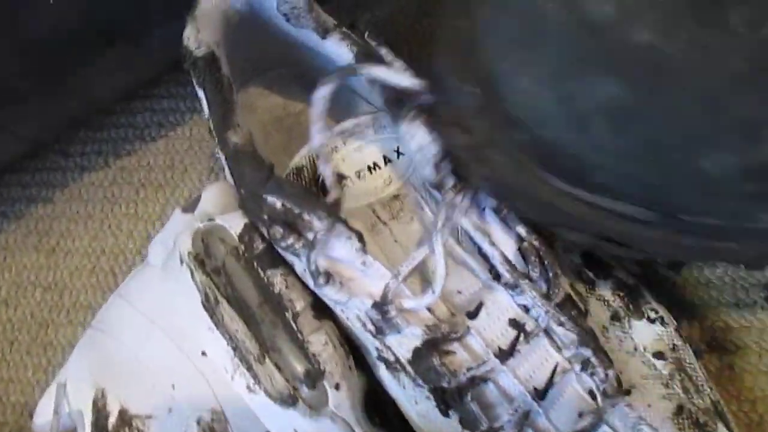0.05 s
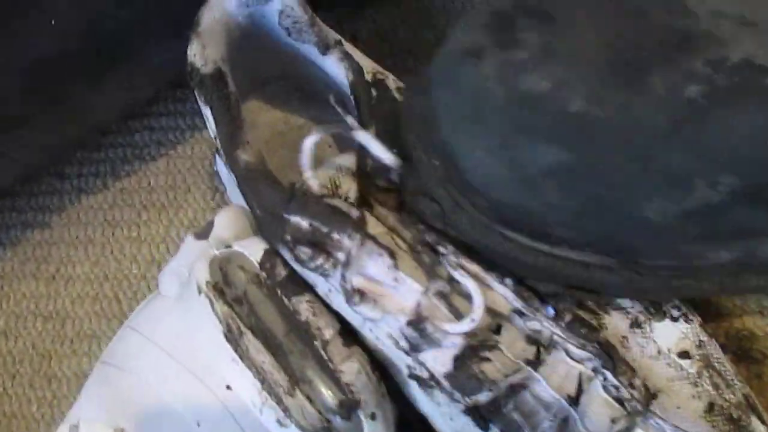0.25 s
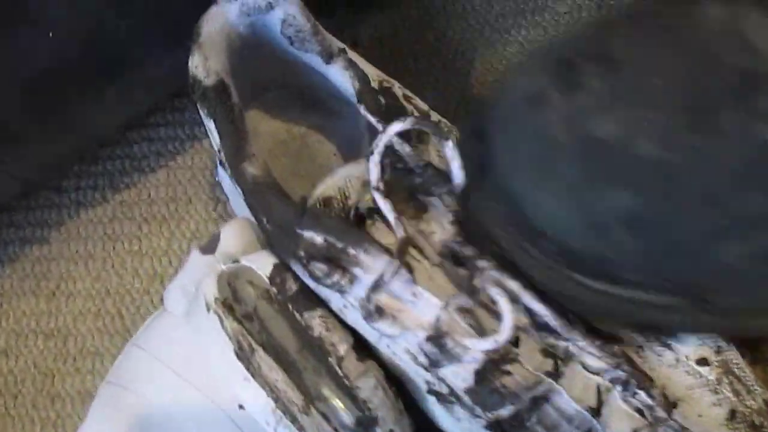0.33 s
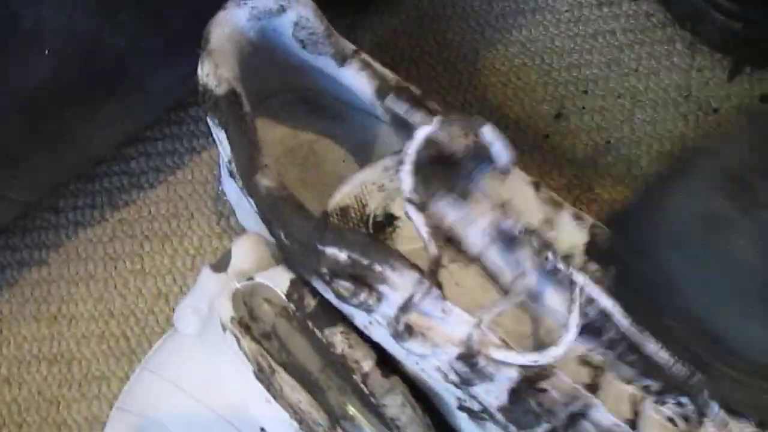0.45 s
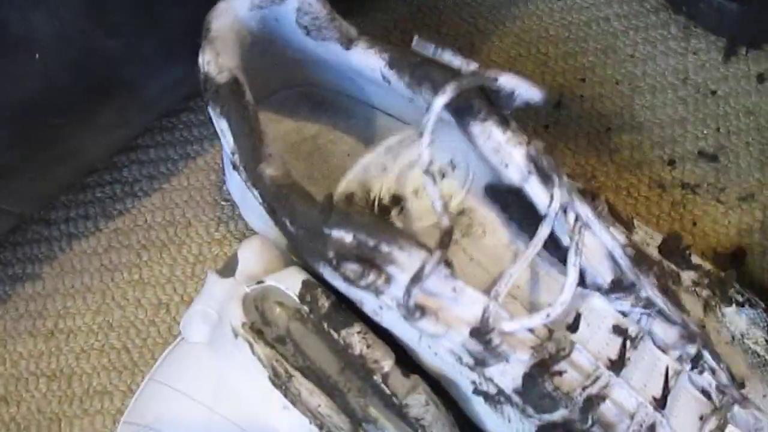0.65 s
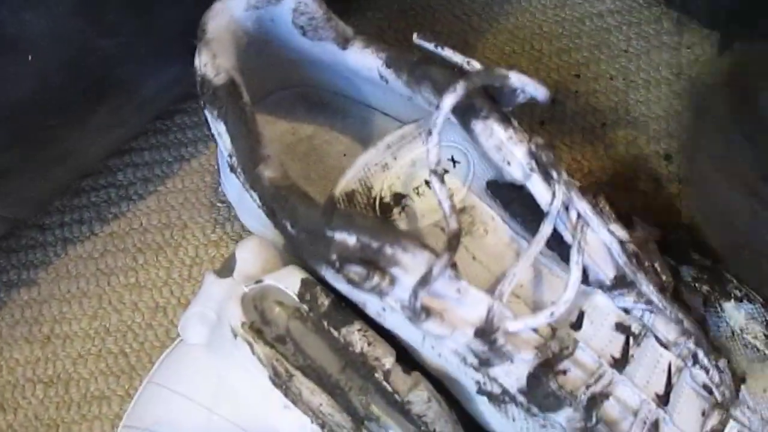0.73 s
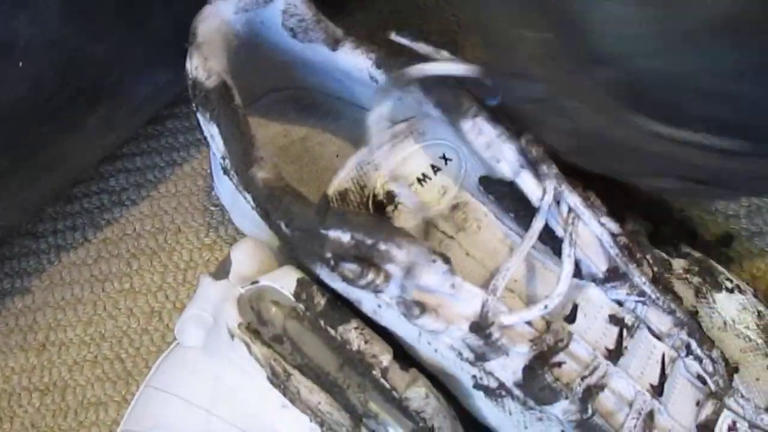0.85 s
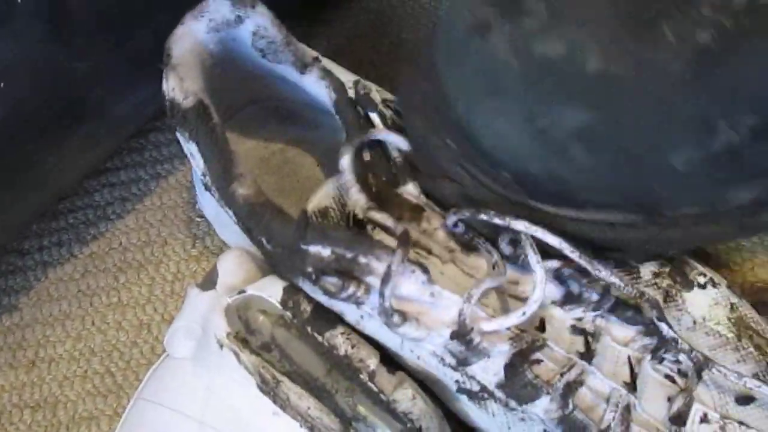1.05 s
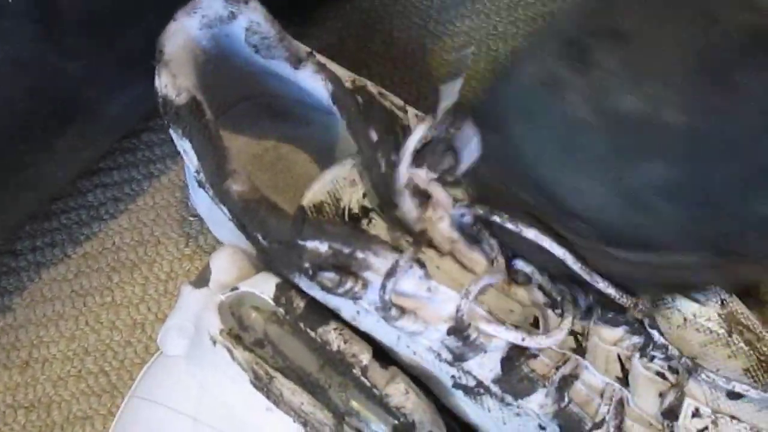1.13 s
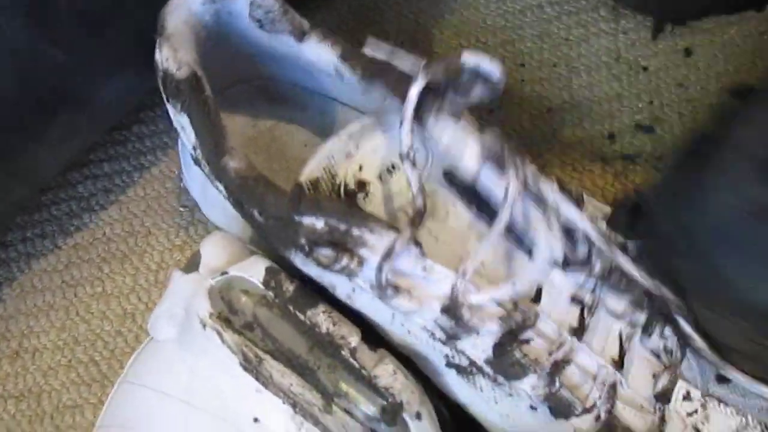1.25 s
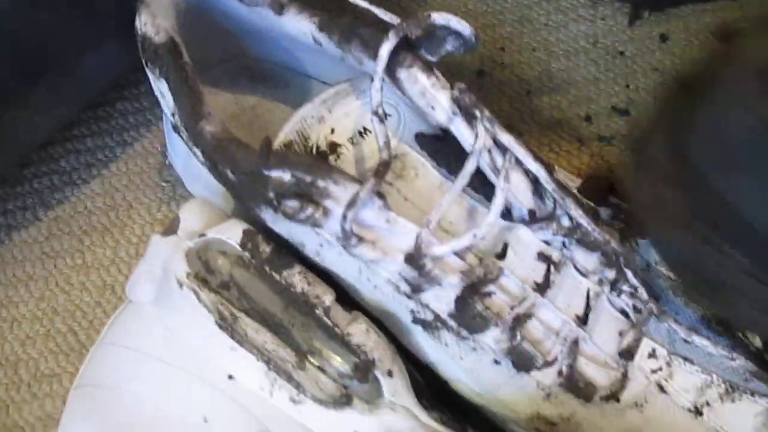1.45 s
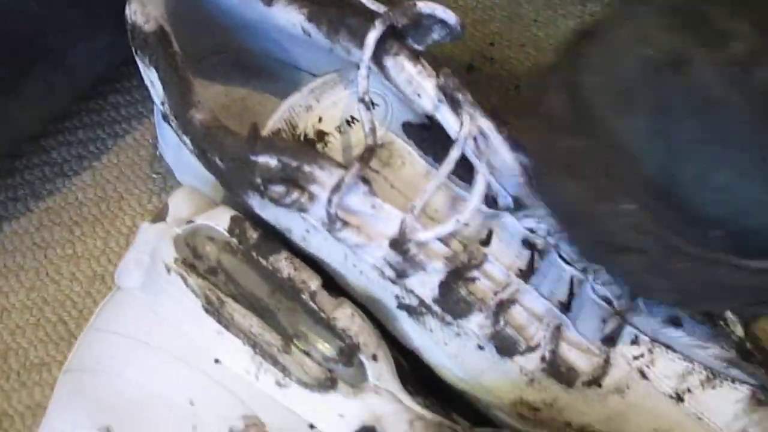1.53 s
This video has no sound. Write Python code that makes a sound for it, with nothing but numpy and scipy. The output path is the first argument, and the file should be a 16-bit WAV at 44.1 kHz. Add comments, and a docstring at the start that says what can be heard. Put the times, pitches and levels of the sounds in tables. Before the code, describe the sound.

A rubber boot scrapes over a muddy shoe, close by in a quiet room. The first gritty rub grows from about 0.2 seconds, with crumbs crunching, then judders into hollow, rubbery knocks until 0.6. A soft floor thud follows near 0.7. The second rub starts around 0.9 seconds, sticks and slips with knocks and a rough groan from 1.1 to 1.35, then fades into faint rubber flexing.

```python
"""Wiping a boot on a muddy shoe

A rubber boot is wiped twice down a muddy shoe that lies on a woven mat, close by in a quiet room.
Each stroke starts as a gritty rub; as the boot bears down it sticks and slips, and the hollow shoe knocks.
The boot's shaft flexes now and then. Between strokes it brushes back lightly and the floor thuds softly."""
import sys
import numpy as np
from scipy import signal
from scipy.fft import rfft, irfft
from scipy.io import wavfile
from scipy.ndimage import uniform_filter1d

SR = 44100
rng = np.random.default_rng(int(sys.argv[2]) if len(sys.argv) > 2 else 0)


def file_out(sig):
    """Save sig as 16-bit WAV at sys.argv[1]."""
    # one column per channel
    cols = np.atleast_2d(sig).T
    # limit, then scale
    lim = np.clip(cols, -1, 1)
    pcm = np.round(lim * 32767).astype(np.int16)
    wavfile.write(sys.argv[1], SR, pcm)


N = 70560

# the sole rubs over dried mud: stroke, light brush back, stroke (t/s, level/dB, share of fine grit/dB)
FIRST_RUB = [(0, -46, -9), (.03, -49, -22), (.084, -44.5, -10), (.105, -51, -7), (.138, -43.5, -28),
             (.18, -45.5, -23), (.21, -34, -10), (.228, -36.5, -1), (.238, -39.5, -19), (.268, -46.5, -16),
             (.304, -37.5, -6), (.375, -31.5, -14), (.398, -30.5, -10), (.408, -31.5, -9),
             (.423, -31.5, -14), (.433, -37.5, -9), (.468, -28, -17.5), (.495, -32, -10), (.52, -34.5, -4),
             (.53, -32, -1.5), (.555, -35.5, -1.5), (.585, -38, -5), (.607, -41, -12), (.616, -56.5, -20)]
BRUSH_BACK = [(.65, -66, -5), (.82, -59.5, -7)]
SECOND_RUB = [(.86, -59, -12), (.91, -49.5, -12), (.922, -41.5, -10), (.942, -42, -5), (.955, -47.5, -7),
              (0.999, -41, -7.5), (1.03, -52.5, -17), (1.082, -33.5, -1), (1.103, -27, -9),
              (1.117, -28.5, -3), (1.14, -24.5, -17), (1.155, -30.5, -13.5), (1.18, -35.5, -9.5),
              (1.227, -32.5, -21), (1.234, -24.5, -36), (1.244, -30.5, -14), (1.28, -37, -3.5),
              (1.293, -39.5, 2), (1.306, -35, -2), (1.312, -46, -16), (1.346, -48.5, -0.5),
              (1.353, -49.5, 4), (1.363, -55, -18), (1.42, -62, -6), (1.555, -52, -11), (1.585, -45.5, -35)]
# tone of coarse mud and of fine grit (f/Hz, level/dB)
MUD_TONE = [(50, -25), (150, -14), (400, 1), (800, 0.5), (1300, 0.5), (2100, 2), (3600, -1), (5400, -4),
            (7000, -18), (10000, -25), (15500, -40)]
GRIT_TONE = [(1000, -23), (3500, -3), (5800, 3.5), (8000, -5), (10000, -13), (12500, -21.5), (15500, -33)]
# pitches at which the shoe's stiff upper rings (f/Hz, width/Hz, level/dB)
UPPER_RINGS = [(847, 18, -2), (1008, 125, 0.5), (1703, 34, -2), (2183, 240, -9.5), (2740, 23, -18.5),
               (3237, 53, -7), (3600, 48, -6), (3840, 51, -11.5), (4980, 27, -14.5), (5190, 53, -10),
               (7180, 160, -7), (9150, 66, -8)]
# how hard the boot presses in each stroke, as the strength of its judder (t/s, level/dB)
FIRST_PRESS = [(0, -65), (.055, -40.5), (.11, -50), (.18, -46.5), (.222, -38.5), (.27, -50), (.31, -38),
               (.37, -37.5), (.405, -27.5), (.43, -30), (.465, -27.5), (.5, -33), (.55, -25), (.572, -33.5),
               (.605, -29.5), (.62, -52), (.66, -61)]
SECOND_PRESS = [(.84, -55), (.94, -48), (1.0, -44.5), (1.04, -47), (1.1, -27.5), (1.145, -36),
                (1.18, -30.5), (1.23, -24.5), (1.275, -27), (1.305, -26.5), (1.322, -34), (1.353, -40),
                (1.37, -52.5), (1.46, -60), (1.55, -58), (1.585, -51), (1.6, -39.5)]
# pitches at which the hollow shoe rings (f/Hz, time to fade by 60 dB/s, level/dB)
SHOE_RINGS = [(321.2, 0.081, -7), (434, 0.062, -3.5), (477.6, 0.054, 2), (531, 0.026, 1), (652, 0.043, -3),
              (764, 0.026, -2.5), (852, 0.068, -7), (978, 0.018, -6)]
# the hollow of the shoe favours middle pitches (f/Hz, level/dB)
HOLLOW_TONE = [(60, -32.5), (200, -8), (255, -9.5), (300, 0.5), (380, 0), (850, 2), (1150, -0.5),
               (3000, -11)]
# the rubber groans higher as the sole tightens (t/s, f/Hz)
GROAN_PITCH = [(.3, 448.3), (.405, 469.3), (.455, 391.6), (.53, 398.4), (.59, 471.1), (1.11, 440.7),
               (1.24, 489.3), (1.27, 576.6), (1.3, 662.5), (1.35, 534)]
# the rubber shaft bends (t/s, level/dB, half length/s), and its tone (f/Hz, level/dB)
SHAFT_FLEXES = [(.04, -39.5, .03), (.225, -34.5, 0.016), (.4, -43, 0.15), (.945, -48, 0.017),
                (1.06, -45.5, 0.049), (1.23, -41, 0.08), (1.408, -39, 0.0066), (1.44, -43.5, 0.019),
                (1.588, -38.5, .013)]
SHAFT_TONE = [(40, -20), (85, -15.5), (140, -2), (205, -2), (290, -11.5), (600, -25.5), (950, -22),
              (1300, -27.5), (2500, -62)]
# crumbs break (t/s, level/dB, rise time/s, ring f/Hz, ring share/dB), and their tone (f/Hz, level/dB)
MUD_CRUMBS = [(0.222, -34, 0.0013, 4500, -6), (.3880, -22.5, 0.0017, 3990, 0),
              (0.415, -21.5, 0.0016, 3310, -5), (0.4196, -22, 0.0014, 5050, 0.5),
              (0.524, -30, 0.0016, 4420, 2), (0.54, -25.5, .001, 5600, -1), (1.0927, -29, 0.00059, 5500, 8),
              (1.135, -25, 0.0012, 2200, -3), (1.139, -27, 0.0024, 1740, -4),
              (1.288, -31.5, 0.003, 6730, -3), (1.3070, -36, 0.0012, 4980, 6)]
CRUMB_TONE = [(60, -45), (300, 0.5), (1200, -5), (2500, -3.5), (5400, -0.5), (7500, -20), (15500, -35)]
# the sole lets go (t/s, level/dB, f/Hz, rise/cycles, share of the upper's sharp bite/dB)
SOLE_SLIPS = [(.4535, -15.5, 380, 0.5, -30), (.4839, -24, 480, 0.77, -26), (0.5065, -15, 406, 0.34, -26),
              (0.5349, -10, 473, 0.44, -29), (0.5466, -11.5, 392, 0.95, -28), (.5566, -19, 635, 1.1, -15),
              (0.5768, -24, 493, 0.91, -26), (0.5865, -20, 476, 1.2, -18), (.5940, -27, 520, 0.87, -22),
              (1.1971, -12, 584.7, 0.32, -19), (1.2072, -18, 292, 1.33, -24), (1.2219, -30, 497, 1.3, -10),
              (1.25, -18, 498, 1.4, -9), (1.2610, -17.5, 590, 0.88, -12), (1.2820, -20.5, 683, 1.1, -24),
              (1.2987, -9.5, 544, 0.46, -13.5), (1.3051, -15, 596.4, 0.96, -7),
              (1.3395, -25.5, 490.8, 0.6, -13), (1.3504, -26.5, 530, 0.63, -20)]
# weight settles on the floor (t/s, level/dB, f/Hz, rise/cycles)
FLOOR_THUDS = [(.666, -28, 68, 1.18), (.691, -38, 106, 0.92), (.740, -45, 63.4, 0.77)]
# the mat crumples (t/s, level/dB, half length/s), and its tone (f/Hz, level/dB)
MAT_CRUMPLES = [(.667, -50, 0.011), (.723, -47, 0.013)]
MAT_TONE = [(100, -18), (270, 5), (450, -4.5), (1000, -15), (4000, -19), (15000, -43)]
# tone of the room's quiet background (f/Hz, level/dB)
AIR_TONE = [(20, -8), (40, -6.5), (70, -6.5), (170, -6), (280, -8), (600, -18.5), (1300, -18.5),
            (3000, -24), (6000, -35), (10000, -37.5), (15500, -41.5)]
# how much of each pitch spreads to left and right (f/Hz, level/dB)
SIDE_TONE = [(100, -75), (1200, -67), (2500, -55), (5000, -12), (9000, -6.5), (14000, -3)]

TIME = np.arange(N) / SR  # seconds
SMALL_SLIPS_PER_S, SMALL_SLIP_SPREAD_DB = 900, 2.5


def undb(db):
    """Turn decibels into a factor to multiply by."""
    return 10 ** (np.asarray(db) / 20)


def unit(x):
    """Scale to an average strength (rms) of 1."""
    return x / np.sqrt(np.mean(x ** 2))


def curve(rows, column=1):
    """One column of a table, joined by straight lines in time."""
    rows = np.array(rows)
    return np.interp(TIME, rows[:, 0], rows[:, column])


def colour(x, tone):
    """Make each pitch louder or softer, as a tone table says."""
    hz, db = np.array(tone).T
    f = np.maximum(np.fft.rfftfreq(2 * N, 1 / SR), 1)
    gain = undb(np.interp(np.log(f), np.log(hz), db))
    cepstrum = irfft(np.log(gain))
    # fold it so that the filter rings only after a sound, never before
    cepstrum[1:N] *= 2
    cepstrum[N + 1:] = 0
    return irfft(rfft(x, 2 * N) * np.exp(rfft(cepstrum)))[:N]


def noise(tone):
    """Noise of strength 1 with the given tone."""
    return unit(colour(rng.standard_normal(N), tone))


def wander(per_s):
    """A line that drifts from one random value to the next."""
    return unit(np.interp(TIME * per_s, np.arange(N), rng.standard_normal(N)))


def grains(per_s, spread_db):
    """Tiny clicks at random times, a few larger than the rest."""
    clicks = (rng.random(N) < per_s / SR) * rng.choice([-1, 1], N)
    return clicks * undb(spread_db * np.minimum(rng.exponential(size=N), 5))


def steady(x, samples):
    """Even out the loudness over stretches this long, keeping the fine grain."""
    power = uniform_filter1d(uniform_filter1d(x ** 2, samples), samples)
    return x / np.sqrt(power + 1e-12)


def swells(rows):
    """Bell-shaped swells from rows of (t/s, level/dB, half length/s)."""
    return sum(undb(db) * np.exp(-.5 * ((TIME - at) / half) ** 2) for at, db, half in rows)


def burst(at, rise):
    """Rise quickly to 1, then die away."""
    age = np.maximum(TIME - at, 0) / rise
    return age * np.exp(1 - age)


def knocks(rows):
    """Quickly fading tones from rows of (t/s, level/dB, f/Hz, rise/cycles)."""
    return sum(undb(db) * burst(at, cycles / hz) * np.sin(2 * np.pi * hz * (TIME - at))
               for at, db, hz, cycles in rows)


def rub():
    """Coarse mud, fine grit and sand catch under the sole in an uneven chatter."""
    rows = FIRST_RUB + BRUSH_BACK + SECOND_RUB
    chatter = unit(undb(1.5 * wander(per_s=200)))
    mud = colour(grains(per_s=6000, spread_db=1), MUD_TONE)
    mud = undb(0.5) * steady(shoe_upper(mud), samples=500)
    grit = colour(grains(per_s=2200, spread_db=3.5), GRIT_TONE)
    grit = undb(1.5) * steady(shoe_upper(grit), samples=500)
    sand = undb(-2) * steady(sand_pings(), samples=700)
    fine_share = undb(curve(rows, column=2))
    return undb(curve(rows)) * chatter * (mud + fine_share * (grit + sand))


def shoe_upper(x):
    """The shoe's stiff upper adds its own ringing to a scrape."""
    t = TIME[:N // 16]
    ring = sum(undb(db) * 2 * np.pi * width / SR * np.exp(-np.pi * width * t) * np.cos(2 * np.pi * hz * t)
               for hz, width, db in UPPER_RINGS)
    return x + signal.fftconvolve(x, ring)[:N]


def sand_pings(per_s=900, low_hz=2825, high_hz=9480, fade_cycles=8, spread_db=2.5):
    """Sand grains spring free, each ringing briefly at its own pitch."""
    out, t = np.zeros(N + 600), TIME[:600]
    for when, pitch, strength in rng.random((int(per_s * N / SR), 3)):
        hz = low_hz * (high_hz / low_hz) ** pitch
        start = int(when * N)
        size = undb(-spread_db * np.log(max(strength, .02)))
        out[start:start + len(t)] += size * np.exp(-t * hz / fade_cycles) * np.sin(2 * np.pi * hz * t)
    return out[:N]


def judder():
    """Many small slips keep the shoe ringing and the rubber groaning while the boot presses."""
    ring = hollow_shoe(grains(SMALL_SLIPS_PER_S, SMALL_SLIP_SPREAD_DB))
    body = steady(colour(ring, HOLLOW_TONE), samples=600)
    pressure = undb(curve(FIRST_PRESS + SECOND_PRESS))
    return pressure * (undb(-2.5) * body + undb(-4) * groan())


def hollow_shoe(x):
    """The hollow shoe answers each push by ringing at its own pitches."""
    t = TIME[:N // 8]
    ring = sum((-1) ** k * undb(db) * np.exp(-np.log(1000) * t / fade) * np.sin(2 * np.pi * hz * t)
               for k, (hz, fade, db) in enumerate(SHOE_RINGS))
    return signal.fftconvolve(x, ring / np.abs(rfft(ring)).max())[:N]


def groan(width_hz=70):
    """Small slips keep the rubber sounding one rough, gliding note."""
    kicks = grains(SMALL_SLIPS_PER_S, SMALL_SLIP_SPREAD_DB) * np.exp(2j * np.pi * rng.random(N))
    wobble = signal.sosfilt(signal.butter(2, width_hz, fs=SR, output="sos"), kicks)
    note = np.exp(2j * np.pi * np.cumsum(curve(GROAN_PITCH)) / SR)
    return steady((wobble * note).real, samples=600)


def shaft():
    """The boot's rubber shaft bends with dull swells of noise."""
    return swells(SHAFT_FLEXES) * steady(noise(SHAFT_TONE), samples=1000)


def crumbs():
    """Crumbs of mud break under the sole, each with a crunch and a ring of its own."""
    bursts = sum(undb(db) * burst(at, rise) for at, db, rise, _, _ in MUD_CRUMBS)
    crunch = bursts * steady(noise(CRUMB_TONE), samples=150)
    rings = knocks([(at, db + ring_db, hz, rise * hz) for at, db, rise, hz, ring_db in MUD_CRUMBS])
    return shoe_upper(crunch) + rings


def big_slips(bite_hz=1410, bite_cycles=1.4):
    """The sole lets go: a rubbery knock, a short ring of the shoe and a sharp bite from its upper."""
    knock = colour(knocks([row[:4] for row in SOLE_SLIPS]), HOLLOW_TONE)
    bite = knocks([(at, db + bite_db, bite_hz, bite_cycles) for at, db, _, _, bite_db in SOLE_SLIPS])
    return knock + undb(-24) * hollow_shoe(knock) + bite


def floor_and_mat():
    """Weight comes down: the floor thuds and the mat crumples softly."""
    return knocks(FLOOR_THUDS) + swells(MAT_CRUMPLES) * noise(MAT_TONE)


def room_echo(x, fade_s=0.22, delay_s=.004):
    """A furnished room sends back a short, faint echo."""
    tail = rng.standard_normal(N) * np.exp(-np.log(1000) * TIME / fade_s) * (TIME > delay_s)
    return undb(-16.5) * signal.fftconvolve(x, tail / np.linalg.norm(tail))[:N]


def scene(air_db=-49):
    """Boot and shoe in the middle of a quiet room; only the treble spreads a little."""
    near = rub() + crumbs() + judder() + big_slips() + shaft() + floor_and_mat()
    middle = near + room_echo(near) + undb(air_db) * noise(AIR_TONE)
    delayed = undb(-10.5) * np.roll(near, 40)
    side = colour(delayed + room_echo(near) + undb(air_db) * noise(AIR_TONE), SIDE_TONE)
    return np.array([middle + side, middle - side])


def record(dry, top_hz=15750, offset=.009):
    """Cut the highest treble and shift the whole wave slightly off zero."""
    return signal.sosfilt(signal.ellip(10, .2, 80, top_hz, fs=SR, output="sos"), dry) + offset


dry = scene()
out = record(dry)
file_out(out)
```